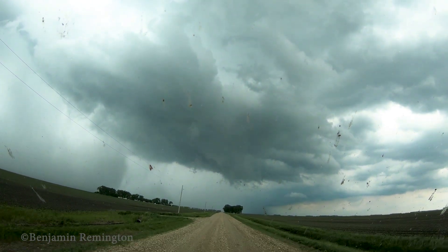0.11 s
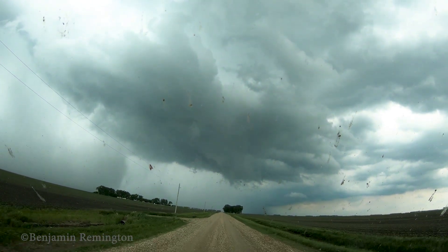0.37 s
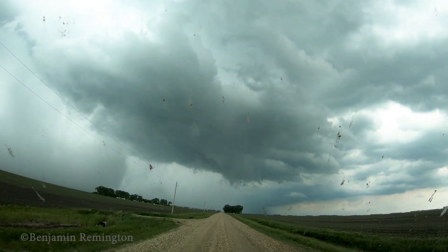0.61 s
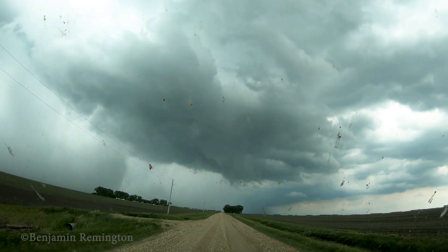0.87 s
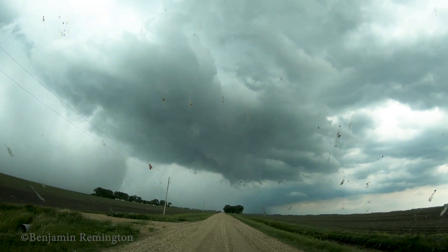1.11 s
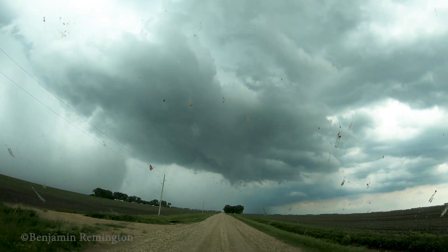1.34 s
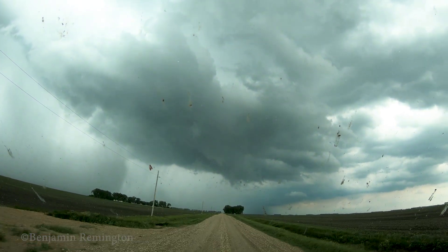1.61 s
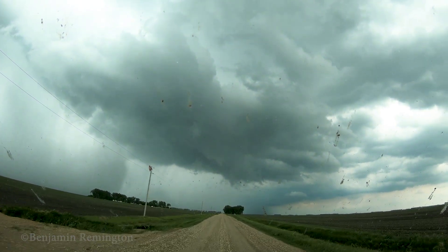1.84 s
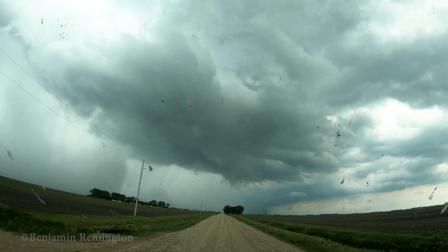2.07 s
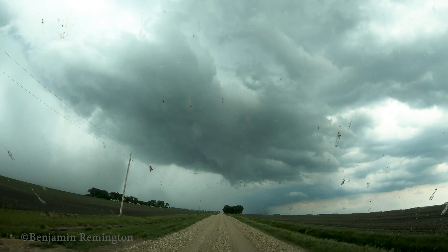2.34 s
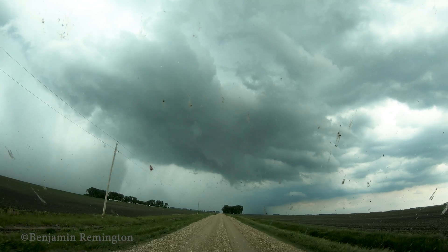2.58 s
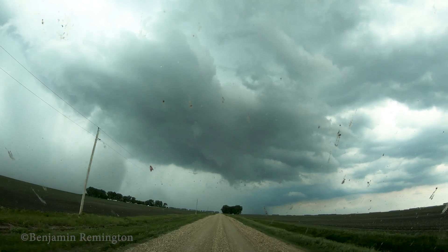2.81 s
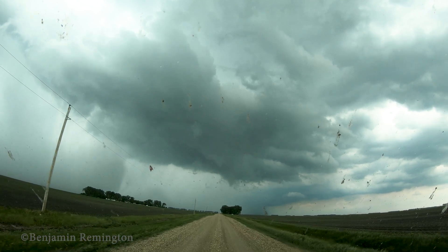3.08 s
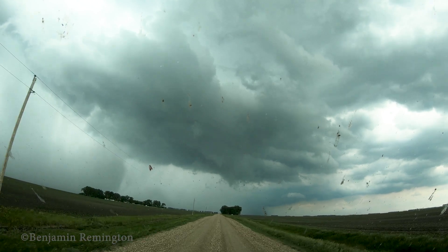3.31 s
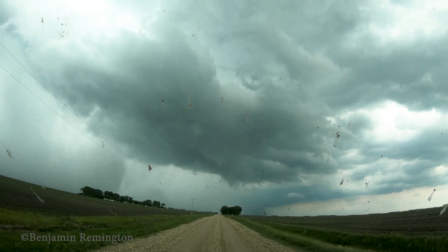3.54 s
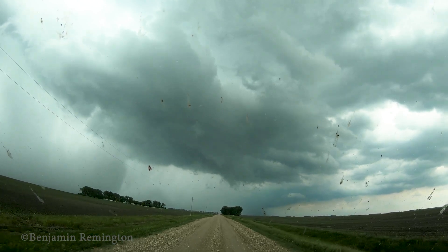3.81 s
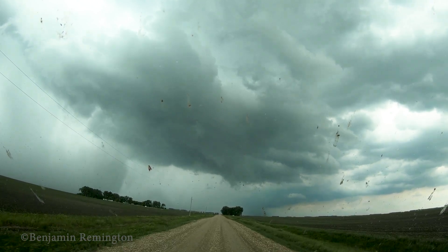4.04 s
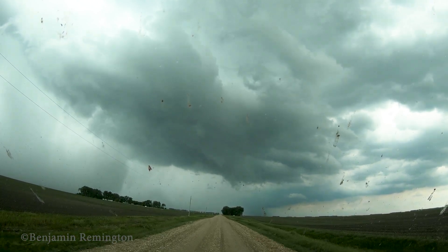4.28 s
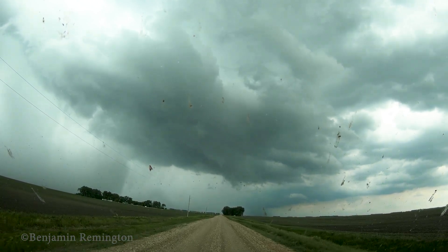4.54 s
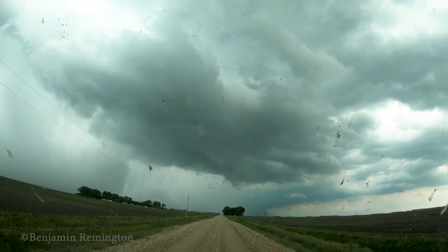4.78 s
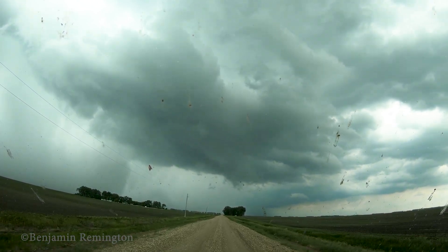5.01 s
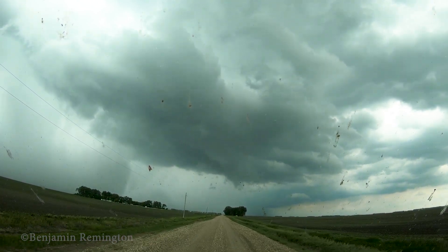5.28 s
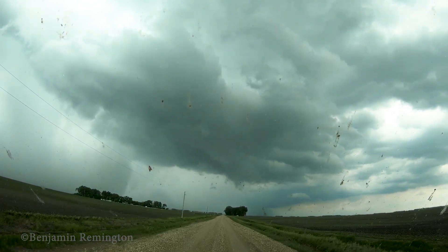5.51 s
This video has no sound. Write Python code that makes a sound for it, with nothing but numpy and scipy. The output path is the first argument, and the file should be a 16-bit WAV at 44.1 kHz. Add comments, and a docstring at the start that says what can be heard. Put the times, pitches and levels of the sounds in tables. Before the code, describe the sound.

Low cabin rumble of a car driving on gravel, with soft crackling under the tyres, scattered stone ticks and a few dull floor thuds.

```python
"""A low rumble fills a car on a gravel road: the rough surface shakes wheels, body and cabin air.
Under it lies a faint engine hum, made of two wavering sine tones.
Gravel crunches under the tyres as crackling noise, and thrown stones patter on wheel arches and floor
as short noise bursts. A few bumps thud through as dying tones of the floor panels.
A small camera holds the peaks down with a fast gain control."""
import sys
import numpy as np
from scipy import signal
from scipy.fft import rfft, irfft
from scipy.io import wavfile
from scipy.ndimage import uniform_filter1d, minimum_filter1d

SR = 44100
rng = np.random.default_rng(int(sys.argv[2]) if len(sys.argv) > 2 else 0)


def convert_level_to_amplitude(level_db):
    """Map a level in decibels to its linear amplitude factor."""
    exponent = np.asarray(level_db, float) / 20
    return 10 ** exponent


def inscribe(sig):
    """Save sig as 16-bit PCM at rate SR to the path in sys.argv[1].

    A 1-D sig is mono; a 2-D sig holds one channel per row.
    Samples are clipped to [-1, 1] before scaling.
    """
    pcm = np.round(np.clip(np.atleast_2d(sig).T, -1, 1) * 32767)
    wavfile.write(sys.argv[1], SR, pcm.astype(np.int16))


N = 248724  # length in samples


def read(points, hz):
    """Reads a spectrum between its points, on a log-frequency axis."""
    f, value = np.transpose(points)
    return np.interp(np.log(hz + 1), np.log(f + 1), value)


def about_mean(curve):
    """Gives a curve at every sample, in dB above or below its own mean."""
    s, db = np.transpose(curve)
    level = np.interp(np.arange(N) / SR, s, db)
    return level - level.mean()


def drift(seconds):
    """Slow random wander of rms 1: noise averaged twice over the given time."""
    size = max(round(seconds * SR), 1)
    wander = uniform_filter1d(uniform_filter1d(rng.standard_normal(N), size), size)
    return wander / wander.std()


def below(x, hz):
    """Keeps what lies below hz, without delay."""
    return signal.sosfiltfilt(signal.butter(3, hz, fs=SR, output="sos"), x)


# resonances: wheel hop, cabin air booms, tyre cavity, then body panels
# columns: f/Hz, width/Hz, lift of the resonance over its surroundings, level/dB
BODY_RESONANCES = [(12.2, 6.2, 1), (41.4, 4.3, 4), (55.3, 14, 6), (114.7, 17.6, 7), (216.2, 11, 7.5),
                   (287, 39, 1), (630.3, 31, 9.5), (689.6, 31, 9.5), (804, 29, 9), (1028, 54, 7),
                   (1424, 350, 8), (2070, 140, 6), (4870, 1300, 1.5)]


def body_gain(hz):
    """Each resonance lifts a bell-shaped band."""
    lift_db = sum(db / (1 + (2 * (hz - f) / width) ** 2) for f, width, db in BODY_RESONANCES)
    return convert_level_to_amplitude(lift_db)


def coloured(x, points):
    """Passes x through a spectrum and the body's resonances; rms 1."""
    hz = np.fft.rfftfreq(len(x), 1 / SR)
    y = irfft(rfft(x) * convert_level_to_amplitude(read(points, hz)) * body_gain(hz), len(x))
    return y / np.sqrt(np.mean(y ** 2))


# engine speed and strength of the hum
# columns: t/s, firing rate f/Hz, level/dB
ENGINE_HUM = [(0, 119, -31), (.9, 117, -30), (1.3, 114, -34), (1.7, 114, -34), (2.1, 120, -31),
              (2.5, 121, -34), (3.0, 119, -32), (3.4, 118, -33), (4.0, 119, -30), (4.35, 117, -33),
              (4.8, 120, -31), (5.3, 115, -33), (5.64, 115, -34)]


def engine():
    """Two low engine orders, at the firing rate and half of it, waver inside the cabin booms."""
    waver_hz, waver_s = 2.5, 0.081  # uneven running
    half_order_db = -1.5  # against the order at the firing rate
    s, hz, db = np.transpose(ENGINE_HUM)
    t = np.arange(N) / SR
    rate_hz = np.interp(t, s, hz) + waver_hz * drift(waver_s)
    phase = 2 * np.pi * np.cumsum(rate_hz) / SR
    orders = np.sin(phase) + convert_level_to_amplitude(half_order_db) * np.sin(phase / 2)
    return convert_level_to_amplitude(np.interp(t, s, db)) * orders


# bumps that thud through the floor
# columns: t/s, strength level/dB, damping time/s, brightness/(dB per octave)
FLOOR_BUMPS = [(0.678, -31, 0.011, -7), (2.489, -33, 0.014, -6), (2.671, -33, 0.012, -6),
               (3.574, -36, 0.016, 1), (4.886, -29.5, 0.007, 3), (5.372, -36, 0.02, -6)]


def bumps():
    """A short, soft push rings the floor panels, which die away at their own pace."""
    rise_share = 0.22  # of the damping time: short bumps are sharper
    t = np.arange(4096) / SR
    out = np.zeros(N + len(t))
    for s, db, damping_s, bright_db in FLOOR_BUMPS:
        ring = np.zeros(len(t))
        for f, width, _ in BODY_RESONANCES:
            if 250 < f < 1500:  # panels only
                decay = np.exp(-min(width, 60) * np.pi * t)
                ring += convert_level_to_amplitude(bright_db * np.log2(f / 800)) * np.sin(2 * np.pi * f * t) * decay
        push = 1 - np.exp(-(t / (rise_share * damping_s)) ** 2)
        out[round(s * SR):][:len(t)] += convert_level_to_amplitude(db) * push * ring * np.exp(-t / damping_s)
    return out[:N]


# road shake reaching the cabin, before the resonances; only its shape counts
# columns: f/Hz, level/dB per Hz
ROAD_SPECTRUM = [(3, -29), (8, -1.5), (20, -5), (31, -6.5), (45, -7.5), (90, -9.5), (150, -9.5), (300, -17),
                 (350, -23), (550, -29), (720, -45.5), (900, -50.5), (1500, -55.5), (3000, -92)]
# three curves of which only the ups and downs count; columns: t/s, level/dB
# the wheels hop over the longest waves of the road
WHEEL_HOP = [(0, -32), (.8, -22), (1.2, -27.5), (1.6, -19), (2.1, -28), (2.7, -23), (3.2, -28), (3.85, -21),
             (4.5, -24.5), (5.0, -25), (5.4, -20.5), (5.64, -25.5)]
# long waves of the road, which shake the whole body
ROAD_WAVES = [(0, -32.5), (.5, -20), (.9, -25), (1.4, -21), (1.65, -25.5), (2.0, -24), (2.4, -24.5),
              (2.9, -22), (3.7, -22), (4.6, -26.5), (5.25, -22), (5.64, -21.5)]
# fineness of the road's ripples, which feed the tyre drone
ROAD_RIPPLE = [(0, -29.5), (1.2, -28), (2.2, -29.5), (2.42, -28), (2.65, -29), (3.5, -28.5), (4.2, -29.5),
               (4.55, -27.5), (4.78, -26), (4.95, -28), (5.15, -24.5), (5.64, -29.5)]


def rumble():
    """Random road shake: hop, shudder and drone follow the road; these and the boom swell by chance."""
    rumble_db = -21  # before the swells
    shake = coloured(rng.standard_normal(N), ROAD_SPECTRUM)
    below_27, below_104, below_130 = below(shake, 27), below(shake, 103.6), below(shake, 129.7)
    hop = below_27 * convert_level_to_amplitude(about_mean(WHEEL_HOP))
    shudder = (below_104 - below_27) * convert_level_to_amplitude(about_mean(ROAD_WAVES))
    boom = below_130 - below_104
    drone = (shake - below_130) * convert_level_to_amplitude(about_mean(ROAD_RIPPLE))
    # random swells: averaging time in s, rms depth in dB
    body = convert_level_to_amplitude(0.5 * drift(0.16)) * (hop + shudder)
    boom = convert_level_to_amplitude(2.0 * drift(0.026)) * boom
    drone = convert_level_to_amplitude(0.4 * drift(0.18)) * drone
    return convert_level_to_amplitude(rumble_db) * (body + boom + drone)


def patchy(x):
    """Single crunches stand out in a band for a moment: random patches over time and frequency."""
    patch_hz, patch_s, patch_db = 700, 0.03, 0.5
    z = signal.stft(x, nperseg=256, noverlap=192)[2]
    field = rng.standard_normal(z.T.shape).T
    for _ in range(2):
        field = uniform_filter1d(field, max(round(patch_hz * 256 / SR), 1), axis=0)
        field = uniform_filter1d(field, max(round(patch_s * SR / 64), 1), axis=1)
    gain = convert_level_to_amplitude(patch_db * field / field.std())
    return signal.istft(z * gain, nperseg=256, noverlap=192)[1][:N]


# crunch of gravel through the floor, before the resonances; only its shape counts
# columns: f/Hz, level/dB per Hz
CRUNCH_SPECTRUM = [(200, -28), (600, -3), (900, -1.5), (1200, -15), (1800, -11), (3000, -14.5),
                   (4500, -22.5), (5300, -27), (6000, -44.5), (9000, -55.5)]
# fine spray, before the resonances; only its shape counts
# columns: f/Hz, level/dB per Hz
SPRAY_SPECTRUM = [(1500, -8.5), (3500, -0.5), (5500, -4.5), (8000, -3), (11000, -8), (14000, -17.5)]
# depth of loose gravel under the wheels (also drives the small stones); only ups and downs count
# columns: t/s, level/dB
GRAVEL_DEPTH = [(0, -60), (.74, -58), (1.0, -60), (1.43, -56.5), (1.76, -58), (2.05, -57.5), (2.18, -56),
                (2.31, -56), (2.39, -55.5), (2.48, -56), (2.53, -57.5), (2.7, -57), (3.42, -58.5),
                (3.75, -56), (4.15, -59), (4.5, -57.5), (4.82, -58.5), (5.05, -56.5), (5.3, -55),
                (5.48, -55), (5.64, -58)]


def crunch():
    """Dense gravel under four tyres: crunch and spray flutter together as patches of loose stones pass."""
    crunch_db, spray_db = -51.5, -73  # before depth and flutter
    spray_follows = 1.7  # dB of spray per dB of deeper gravel
    chips_per_s, chip_s, chip_db = 360, 0.0012, -7  # single chips that crackle out of the noise
    deep_db = about_mean(GRAVEL_DEPTH)
    flutter_db = 1.0 * drift(0.04) + 0.17 * drift(0.0021)
    chips = np.minimum(rng.exponential(1, N), 2) * (rng.random(N) < chips_per_s / SR)
    dying_chips = signal.lfilter([1], [1, -np.exp(-1 / (chip_s * SR))], chips)
    crackle = 1 + convert_level_to_amplitude(chip_db) * dying_chips
    coarse = coloured(np.sqrt(crackle) * rng.standard_normal(N), CRUNCH_SPECTRUM)
    fine = coloured(crackle * rng.standard_normal(N), SPRAY_SPECTRUM)
    coarse *= convert_level_to_amplitude(crunch_db + deep_db + flutter_db)
    fine *= convert_level_to_amplitude(spray_db + spray_follows * deep_db + 1.2 * flutter_db)
    return patchy(coarse + fine)


def rms_under(shape, x):
    """Level of x where the envelope is open."""
    return np.linalg.norm(shape * x) / np.linalg.norm(shape)


# a stone's patter on sheet metal, before the resonances; only its shape counts
# columns: f/Hz, level/dB per Hz
PATTER_SPECTRUM = [(500, -27.5), (1500, -13), (2500, -4.5), (4500, 4), (6000, -5.5), (9000, -5.5),
                   (12000, -9), (14000, -24)]


def patter(bright_db, knock_db, length_s):
    """One stone: a quick rise, a short rattle on the metal and a dying tail, with a panel knock."""
    rise_share = 0.33  # the rattle builds over a share of its length
    knock_rise_s, knock_ring_s = 0.002, 0.045  # the panel answers at once
    t = np.arange(8192) / SR
    hz = np.fft.rfftfreq(len(t), 1 / SR)
    rattle = rfft(rng.standard_normal(len(t))) * body_gain(hz)
    tilt_db = bright_db * np.log2(hz / 5000 + 0.21)
    tone = irfft(rattle * convert_level_to_amplitude(read(PATTER_SPECTRUM, hz) + tilt_db))
    upper = signal.sosfilt(signal.butter(4, 3500, "high", fs=SR, output="sos"), tone)
    knock = irfft(rattle / (1 + ((hz - 2100) / 500) ** 2))  # a floor panel answers near 2 kHz
    body_and_tail = 0.31 * np.exp(-(t / length_s) ** 2) + 0.13 * np.exp(-t / 0.03)
    shape = (1 - np.exp(-t / (rise_share * length_s))) * body_and_tail
    ring = 0.4 * (1 - np.exp(-t / knock_rise_s)) * np.exp(-(t / knock_ring_s) ** 2)
    # the rattle is levelled by its part above 3.5 kHz
    rattling = shape * tone / rms_under(shape, upper)
    knocking = ring * convert_level_to_amplitude(knock_db) * knock / rms_under(ring, knock)
    return rattling + knocking


# loud thrown stones
# columns: t/s, level/dB (before the envelope), brightness/(dB per octave),
# panel knock against the rattle, level/dB (before the envelopes), length/s
LOUD_STONES = [(0.262, -52, -6, -12, 0.024), (0.422, -53.5, -1, -1, 0.027), (0.5935, -41, 3, -10, 0.014),
               (0.71, -52.5, -1.5, -13, 0.019), (0.774, -55, -3, -12, 0.016),
               (1.412, -52.5, -8, -12, 0.0092), (1.481, -53, -3, -1, 0.017), (1.563, -56.5, 3, -5.5, 0.019),
               (1.622, -63, -2, -9, 0.015), (1.776, -52, -2, -3, 0.016), (2.044, -57, -2, 2, 0.013),
               (2.123, -60, 0, 11, 0.01), (2.216, -54.5, -8, -2, 0.012), (2.283, -53.5, 1, 6, 0.016),
               (2.309, -54.5, -5, 2, 0.017), (2.484, -61, -2, -5, 0.014), (2.660, -48.5, -7, -8, 0.014),
               (2.853, -57, -6, -5, 0.02), (2.941, -60, -4, 5, 0.018), (3.029, -55.5, 0, 9, 0.017),
               (3.302, -56, -4, -5, 0.026), (3.561, -45.5, 2, 9.5, 0.034), (3.64, -53, -1, -7, 0.018),
               (3.776, -54, -1, 2, 0.018), (3.822, -51, -3, -17, 0.006), (3.874, -54, -9, 1.5, 0.018),
               (4.004, -50.5, -11, -2, 0.0094), (4.352, -59.5, 1, 10.5, 0.016),
               (4.439, -56, -0.5, -4, 0.035), (4.780, -55.5, 4, -4, 0.022), (4.87, -56.5, 4, 4.5, 0.022),
               (5.052, -55.5, -2, 7, 0.025), (5.257, -59, -2.5, -8, 0.008), (5.294, -53.5, -8, 5, 0.024),
               (5.473, -55, -1, 7, 0.029)]


def stones():
    """Loud stones hit at their moments, and many small ones at random, stronger in deep gravel."""
    small_per_s, small_db = 37, -71.5  # level before depth and chance
    small_follow = 1.2  # dB per dB of deeper gravel
    out = np.zeros(N + 8192)
    for s, db, bright_db, knock_db, length_s in LOUD_STONES:
        out[round(s * SR):][:8192] += convert_level_to_amplitude(db) * patter(bright_db, knock_db, length_s)
    chance_db = 1.7 * np.minimum(rng.exponential(1, N), 4)
    size = convert_level_to_amplitude(small_db + small_follow * about_mean(GRAVEL_DEPTH) + chance_db)
    # each small stone gets one of twelve sounds; -1 means no stone
    kind = np.where(rng.random(N) < small_per_s / SR, rng.integers(0, 12, N), -1)
    for k in range(12):
        sound = patter(rng.uniform(-1.0, 1), -6.0, rng.uniform(0.004, 0.015))
        out[:N] += signal.oaconvolve(size * (kind == k), sound)[:N]
    return out[:N]


def scene():
    """Everything reaches one microphone on the dashboard."""
    return (engine() + bumps() + rumble() + crunch() + stones())[None]


def top_cut(x):
    """Nothing passes above the cut-off."""
    return signal.sosfilt(signal.butter(12, 14000, fs=SR, output="sos"), x)


# the microphone in its housing
# columns: f/Hz, level/dB
MICROPHONE_RESPONSE = [(5000, -1), (8200, -2.5), (9500, -5.5), (10000, -13), (10900, -4), (11600, -9.5),
                       (12000, -10), (14000, -11.5)]


def record(dry):
    """The microphone colours the treble; gain control follows peaks at once and recovers steadily."""
    neutral_db, floor_db = -13, -15  # peak level left unchanged; lowest level the control follows
    recovery_db_per_s = 88.5  # fall of the followed level
    squeeze = 0.72  # dB of gain change per dB of followed level
    mirrored = np.concatenate([dry, dry[:, ::-1]], axis=1)  # both ends join smoothly
    response = convert_level_to_amplitude(read(MICROPHONE_RESPONSE, np.fft.rfftfreq(2 * N, 1 / SR)))
    heard = irfft(rfft(mirrored) * response, 2 * N)[:, :N]
    peak_db = 20 * np.log10(abs(heard[0]) + 1e-9)
    fall = np.arange(N) * recovery_db_per_s / SR
    held_db = np.maximum(np.maximum.accumulate(peak_db + fall) - fall, floor_db)
    early_db = -minimum_filter1d(-held_db, size=260)  # looks a few ms ahead
    smooth_db = uniform_filter1d(uniform_filter1d(early_db, size=130), size=130)
    mix = heard / convert_level_to_amplitude(squeeze * (smooth_db - neutral_db))
    return top_cut(mix)


dry = scene()
out = record(dry)
inscribe(out)
```